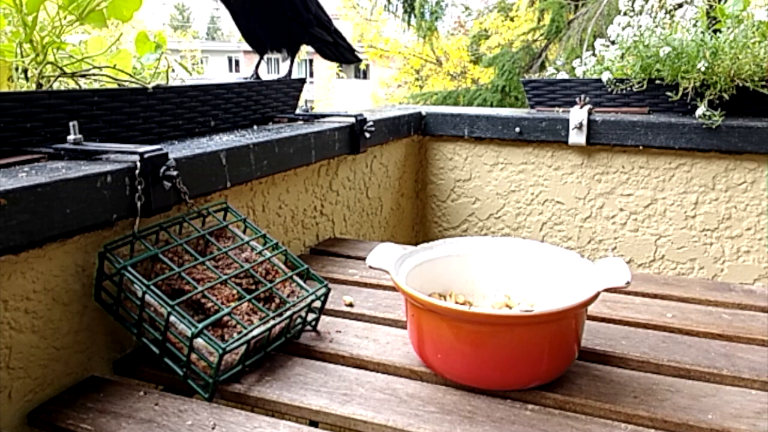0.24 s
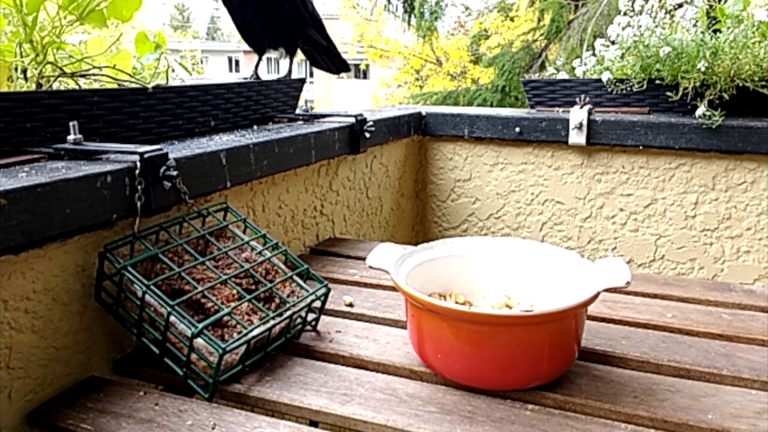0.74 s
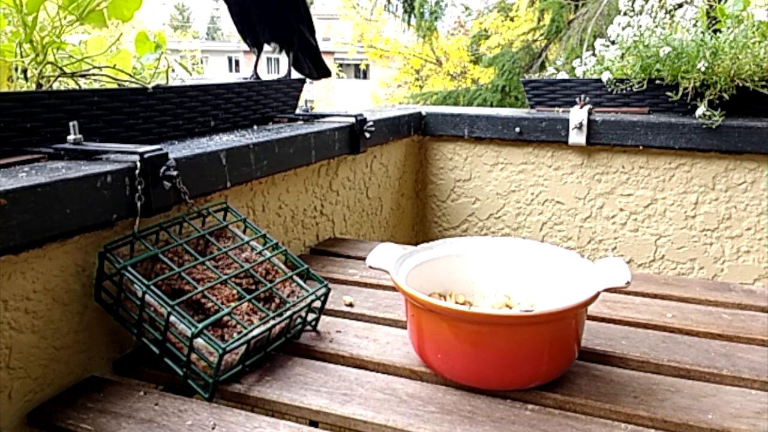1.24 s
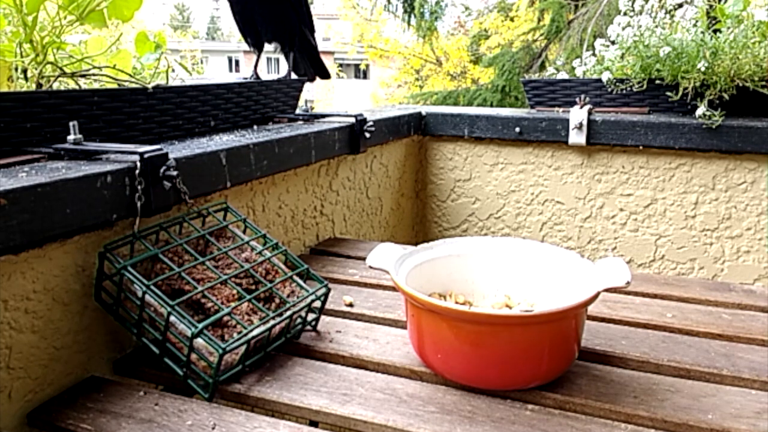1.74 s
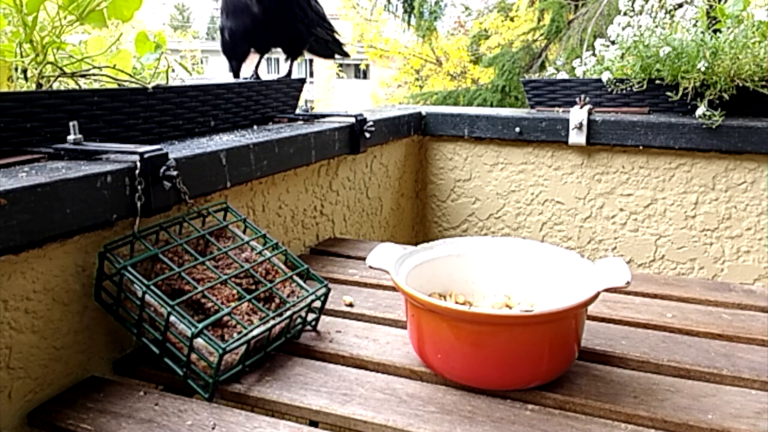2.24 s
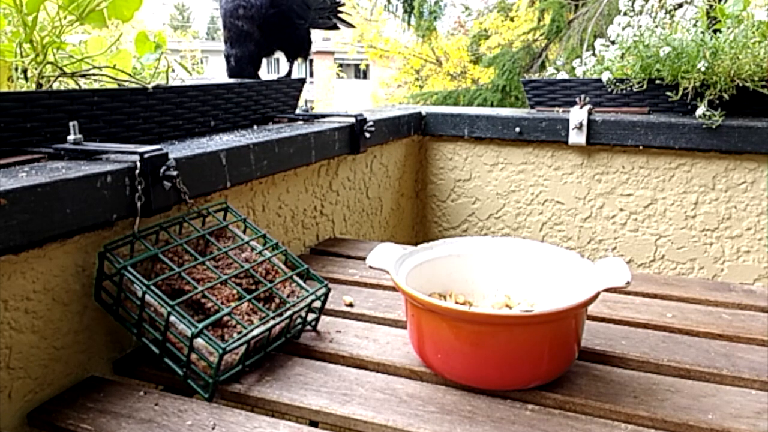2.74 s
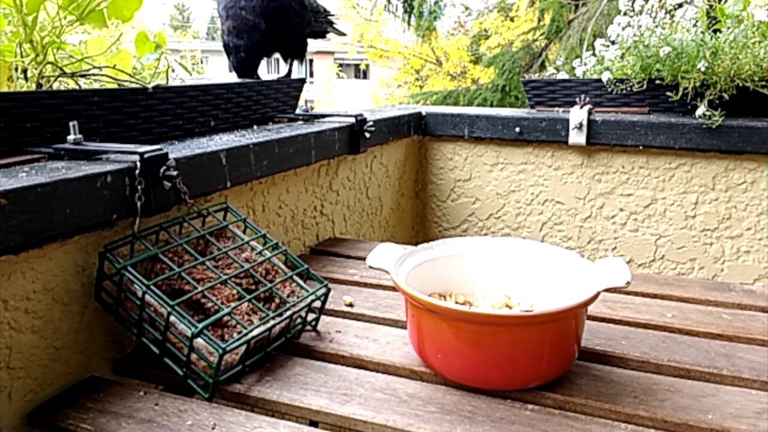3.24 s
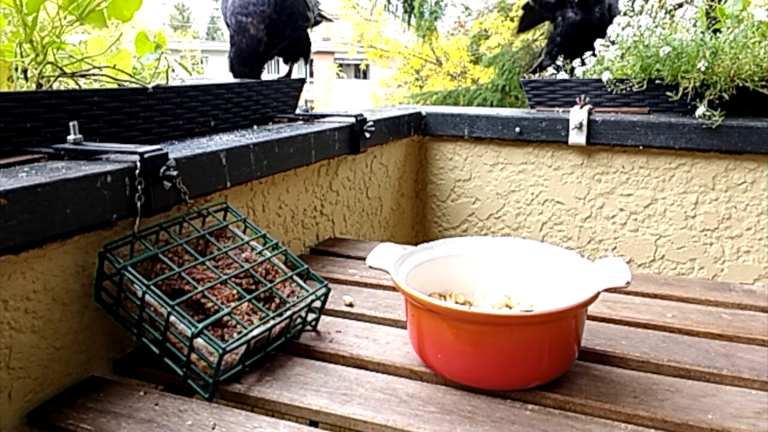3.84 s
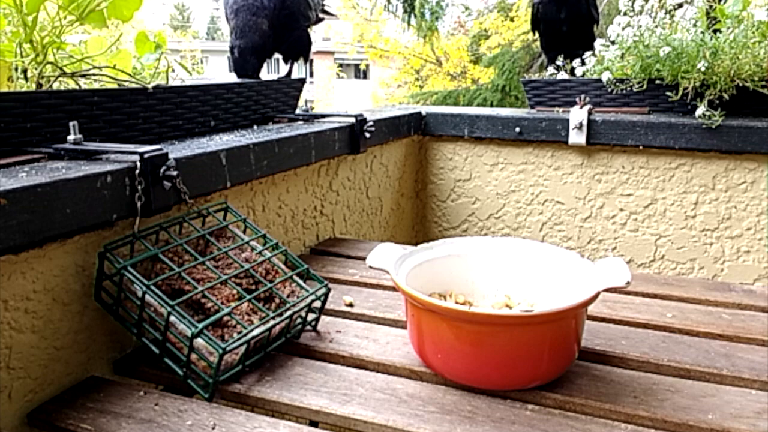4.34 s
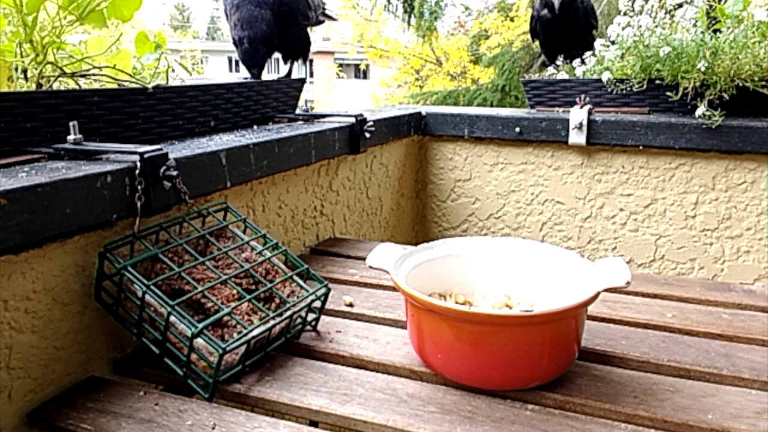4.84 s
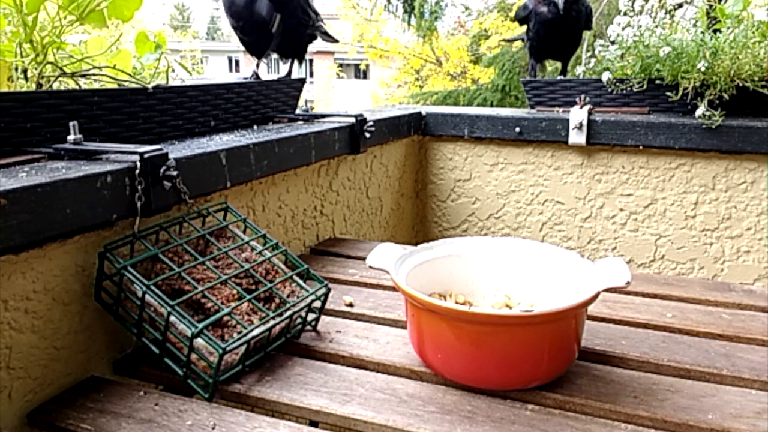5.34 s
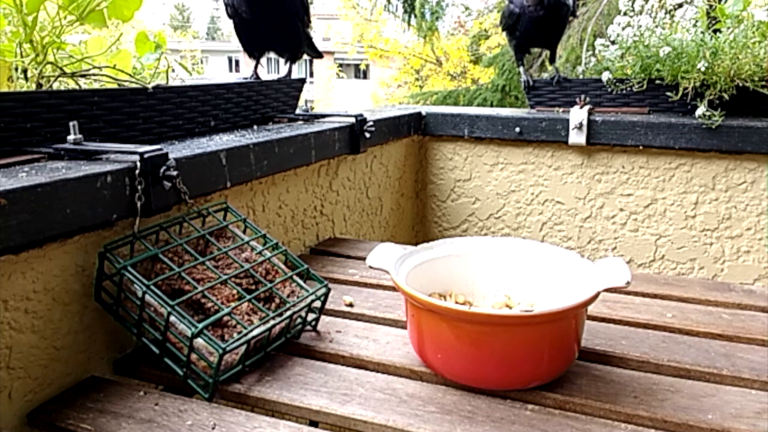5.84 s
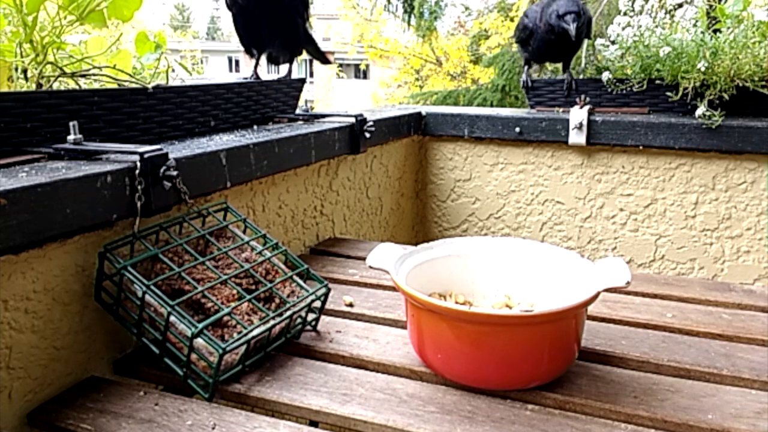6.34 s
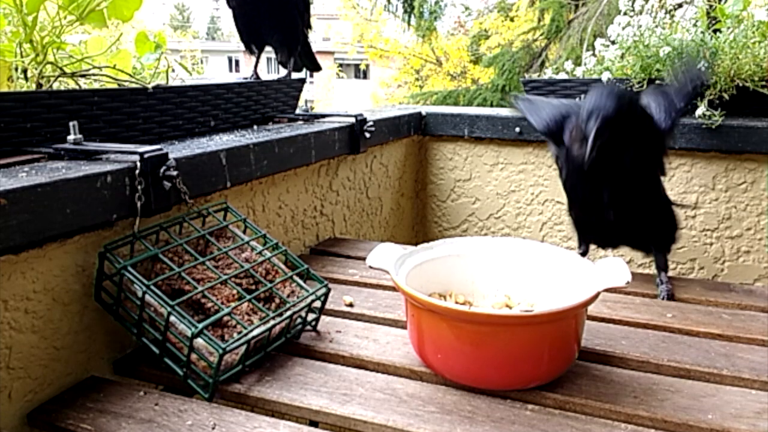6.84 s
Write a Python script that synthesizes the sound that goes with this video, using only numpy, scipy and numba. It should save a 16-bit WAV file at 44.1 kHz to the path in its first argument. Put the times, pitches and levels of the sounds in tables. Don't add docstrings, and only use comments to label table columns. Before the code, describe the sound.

Throughout, a soft, low town rumble with distant vehicles swelling gently, strongest near 1.5 s, a faint steady fan hum and a fine, fluctuating drizzle hiss. Small drops tick on leaves, spit brightly on thin plastic and drip with tiny short notes. Between about 2.1 and 3.2 s a small bird peeps very faintly far off. At 3.7 s a bird lands on a planter with a light knock, a claw scrape and a low wobble; feet settle at 3.9 s. Harsh, nasal caws follow at 4.9, 5.5 and 6.3 s, each about a third of a second, scooping up then sagging, with close wall reflections and a fainter yard echo. Small claw scratches and steps fall around them. At 6.9 s a rapid, heavy cluster of blows and scraping claws hits the wooden table with a low thud, then at 7.07 s two quick claw clacks strike a dish as it ends.

```python
import sys
import numpy as np
from scipy import signal
from scipy.fft import rfft, irfft
from scipy.io import wavfile
from scipy.ndimage import uniform_filter1d
from numba import njit

SR = 44100
rng = np.random.default_rng(int(sys.argv[2]) if len(sys.argv) > 2 else 0)


def waveform_to_disk(signal):
    frames = np.transpose(np.atleast_2d(signal))
    scaled = np.clip(frames, -1, 1) * 32767
    samples = np.round(scaled).astype(np.int16)
    wavfile.write(sys.argv[1], SR, samples)


def ratio_of_db(decibels):
    return 10 ** (np.asarray(decibels, float) / 20)


N = 313551


def level(x, db):
    return x * ratio_of_db(db) / np.sqrt(np.mean(x ** 2))


@njit
def moving_resonance(x, hz, width_hz):
    out, band_state, low_state = np.empty(len(x)), 0., 0.
    for i in range(len(x)):
        g = np.tan(np.pi * hz[i] / SR)
        k = width_hz / hz[i]
        v = (band_state + g * (x[i] - low_state)) / (1 + g * (g + k))
        band_state = 2 * v - band_state
        low_state += 2 * g * v
        out[i] = k * v
    return out


def band(x, hz, width_hz):
    centre = np.clip(hz, 20, .45 * SR) + np.zeros(len(x))
    once = moving_resonance(x, centre, 1. * width_hz)
    return moving_resonance(once, centre, 1. * width_hz)


def ring(x, modes):
    out = np.zeros(len(x))
    for k, (hz, db, t60) in enumerate(modes):
        pole = np.exp(2j * np.pi * hz / SR - np.log(1000) / (t60 * SR))
        out += (-1) ** k * ratio_of_db(db) * signal.lfilter([1], [1, -pole], x).imag
    return out


def colour(x, points):
    hz, db = np.transpose(points)
    f = np.arange(len(x) // 2 + 1) * SR / len(x) + 1
    return irfft(rfft(x) * ratio_of_db(np.interp(np.log(f), np.log(hz), db)), len(x))


def walk(rate):
    k = int(SR / rate)
    held = np.repeat(rng.standard_normal(N // k + 1), k)
    return 1.56 * uniform_filter1d(uniform_filter1d(held, k), k)[:N]


def add(out, s, sound):
    i = int(s * SR)
    out[i:i + len(sound)] += sound[:len(out) - i]


# hz, level_db (per Hz)
TOWN_SPECTRUM = [(15, -38), (25, -44), (49, 4), (71, 4), (132, -7.5), (187, -8), (244, -8.5), (356, -15.5),
                 (960, -19), (1880, -26), (3040, -27.5), (3870, -30), (9380, -32), (15200, -24.5)]
# nearest_s, level_db (above the hum), fade_s
VEHICLES = [
    (0.1, 2, 0.44),
    (1.48, 5.5, 0.21),
    (4.3, 0.5, 0.16),
    (5.95, 3.5, 0.19),
    (6.8, 2.5, 0.27),
]
# time_s, level_db (against its mean)
DRIZZLE = [(0.0, 4.5), (0.2, -.5), (1.3, 2.5), (1.58, 2), (1.82, 0), (2.4, 0.5), (2.8, -1), (3.2, 2),
           (3.54, 4.5), (3.8, 0), (4.34, -2), (4.85, 0), (5.33, 6.5), (5.56, -3.5), (5.9, 2), (6.4, -2),
           (6.73, 1.5), (7.0, 4)]


def town():
    t = np.arange(N) / SR
    traffic_db = sum(db * np.exp(-((t - s) / fade_s) ** 2) for s, db, fade_s in VEHICLES)
    drizzle_db = np.interp(t, *np.transpose(DRIZZLE))
    f = np.arange(N // 2 + 1) * SR / N + 1
    out, shared = 0, walk(14)
    for hz in 25 * 2 ** np.arange(0, 9.7, .4):
        wet = np.clip(np.log2(hz / 300) / 4, 0, 1)
        swell_db = (1 - wet) * traffic_db + wet * drizzle_db
        hits = (rng.random(N) < 25 / SR) * np.minimum(rng.exponential(size=N), 2.5)
        soft_hits = uniform_filter1d(hits, size=300) * 1.8
        specks = signal.lfilter([1], [1, -np.exp(-1 / (0.013 * SR))], soft_hits)
        flicker_db = wet * (.9 * shared + walk(14))
        gain = ratio_of_db(swell_db + flicker_db) * (1 + .5 * wet ** 2 * specks)
        shape = np.cos(np.pi / 2 * np.clip(np.log2(f / hz) / .4, -1, 1))
        out = out + gain * irfft(rfft(rng.standard_normal(N)) * shape, N)
    fan_hz, fan_db = 119.4, -56
    fan = ratio_of_db(fan_db + 2 * walk(7.3)) * np.sin(2 * np.pi * fan_hz * t + 0.16 * walk(22))
    return level(colour(out, TOWN_SPECTRUM), -47) + fan


def burst(db, t60, rise_s=0.00093):
    t = np.arange(int(.35 * SR)) / SR
    rise = 1 - np.exp(-t / rise_s)
    fade = ratio_of_db(-60 * t / t60) + 2.14 * ratio_of_db(-60 * t / 0.031)
    return ratio_of_db(db) * rng.standard_normal(len(t)) * rise * fade


def splashes(table, t60, share):
    out = np.zeros(N)
    for s, db, hz in table:
        width_hz = share * hz
        add(out, s, band(burst(db, t60, rise_s=0.0012), hz, width_hz) / np.sqrt(width_hz / SR))
    return ratio_of_db(-12.0) * out


# start_s, peak_db, pitch_hz
LEAF_DROPS = [(0.018, -48, 5000), (0.157, -47.5, 4420), (0.21, -46.5, 9030), (0.745, -41.5, 4600),
              (0.924, -42.5, 10300), (0.9666, -40.5, 5780), (1.0794, -43, 6600), (1.2266, -48.5, 3620),
              (1.4643, -37, 7300), (1.7544, -43.5, 8700), (2.029, -44.5, 7400), (2.1879, -48, 7900),
              (2.3441, -49.5, 1570), (2.382, -47, 8000), (2.5451, -46.5, 2600), (2.6183, -51, 3750),
              (2.6594, -51, 3840), (2.7697, -47, 2100), (3.0989, -46.5, 6030), (3.579, -46.5, 4380),
              (3.76, -54, 2300), (3.985, -51, 3080), (4.0427, -52, 2900), (4.0632, -38.5, 10000),
              (4.13, -54, 2970), (4.3794, -54, 4670), (4.4577, -46.5, 2840), (4.5393, -45, 7350),
              (4.8696, -38.5, 9000), (6.129, -46.5, 2520)]
# start_s,
# peak_db, pitch_hz
PLASTIC_DROPS = [(0.158, -36, 15200), (0.9664, -40, 13600), (1.0794, -40, 14600), (2.2214, -36, 13800),
                 (2.3501, -37, 14800), (2.8409, -38, 14300), (3.1194, -37, 14500), (3.2994, -37, 14800),
                 (3.4694, -36, 15400), (3.5094, -41, 12800), (3.691, -30, 15100), (3.7194, -35, 15300),
                 (3.927, -37, 15100), (4.5386, -39, 14100), (4.803, -42, 13400), (5.2165, -30, 14100),
                 (5.3154, -35, 15100), (5.9414, -45, 10800), (5.9594, -43, 15100), (6.0581, -43, 14000),
                 (6.0851, -40.5, 12200), (6.4847, -27.5, 14500), (6.7186, -35.5, 9200)]
# start_s, peak_db, pitch_hz
DRIPS = [(0.5994, -68, 2840), (0.659, -50.5, 3060), (0.9368, -46.5, 1685), (1.0331, -51, 2780),
         (1.0799, -44.5, 2300), (1.1444, -51, 2970), (1.1653, -49, 1760), (1.2271, -55, 3820),
         (1.4785, -51, 2830), (1.5604, -54, 4000), (1.7579, -53, 2740), (2.0303, -54, 1700),
         (2.1216, -45.5, 1690), (2.1683, -52, 1670), (2.2223, -49.5, 3370), (2.3231, -54, 1810),
         (2.4094, -49.5, 3420), (2.4414, -48, 1590), (2.4733, -52, 3120), (2.5007, -51.5, 1700),
         (2.645, -53, 3050), (2.7994, -46, 3130), (3.046, -50, 3050), (3.1408, -48, 2390),
         (3.2929, -48, 3020), (3.5763, -50, 1700), (4.1794, -58, 3000), (4.3246, -56, 2460),
         (4.811, -47, 3100), (6.1694, -63, 1450)]


def raindrops():
    leaves = splashes(LEAF_DROPS, t60=.1, share=.15)
    plastic = splashes(PLASTIC_DROPS, t60=.14, share=.6)
    return leaves + plastic + splashes(DRIPS, t60=.06, share=.09)


@njit
def walls(x, lags, gain, damp):
    line, soft, out = np.zeros((8, 4096)), np.zeros(8), np.zeros(len(x))
    for i in range(len(x)):
        total = 0.
        for k in range(8):
            soft[k] += (1 - damp) * (gain[k] * line[k, (i - lags[k]) & 4095] - soft[k])
            total += soft[k]
            out[i] += soft[k] * (1 - 2 * (k % 2))
        for k in range(8):
            line[k, i & 4095] = x[i] + soft[k] - total / 4
    return out


# pitch_hz, level_db, t60_s
WALL_MODES = [(1333, 7.5, 0.29), (1455, 3, 0.23), (1593, -4, 0.39), (1736, 0, 0.17), (1920, -4, 0.32),
              (2100, 8.5, 0.15), (1051, 12.5, 0.05), (3094, 8.5, 0.3)]


def echoes(near, bird):
    lags = np.array([331, 419, 557, 683, 809, 947, 1153, 1361])
    walls_t60_s, yard_t60_s = 0.28, 1.26
    echo = walls(near, lags, ratio_of_db(-60 * lags / SR / walls_t60_s), 0.19)
    echo += ratio_of_db(-15.5) * walls(bird, 3 * lags, ratio_of_db(-180 * lags / SR / yard_t60_s), 0.28)
    return ratio_of_db(-9.5) * echo + ratio_of_db(-57.0) * ring(bird, WALL_MODES)


# start_s, length_s, level_db, start_hz, end_hz
FAR_BIRD = [
    (2.075, .03, -68, 5000, 4750),
    (2.445, .06, -69, 4850, 5000),
    (2.605, .03, -67, 3350, 3750),
    (2.625, .11, -64, 3760, 3780),
    (2.61, .03, -68, 5050, 4900),
    (2.315, .05, -65, 1850, 1550),
    (3.14, .11, -65, 2350, 2280),
    (2.5, .08, -66, 1700, 1680),
]


def far_bird():
    out = np.zeros(N)
    for s, length_s, db, start_hz, end_hz in FAR_BIRD:
        n = int(length_s * SR)
        hz = np.linspace(start_hz, end_hz, n) * (1 + .006 * walk(120)[:n])
        loudness = ratio_of_db(db + 2 * walk(80)[:n]) * np.hanning(n) ** .5
        add(out, s, loudness * np.sin(2 * np.pi * np.cumsum(hz) / SR))
    return out


# start_s, blow_db, scrape_db, scrape_t60_s
ON_PLANTER = [
    (3.671, -33.5, -47, 0.11),
    (3.685, -50, -44.5, 0.42),
    (3.715, -48, -65, 0.25),
    (3.915, -46, -59, .1),
    (4.869, -67, -44, 0.082),
    (4.89, -57, -49, 0.057),
    (5.44, -41.5, -61, 0.091),
    (5.94, -38.5, -64, 0.12),
]
ON_TABLE = [
    (6.91, -58, -69, .3),
    (6.926, -23, -34, 0.098),
    (6.931, -30, -31, 0.16),
    (6.938, -23.5, -34, 0.26),
    (6.943, -25, -37, 0.094),
    (6.948, -24.5, -41, 0.094),
    (6.957, -21, -45, 0.1),
    (6.985, -30.5, -46, 0.11),
]
ON_DISH = [
    (7.068, -34.5, -38, 0.32),
    (7.0755, -31, -37.5, 0.48),
]
# pitch_hz, level_db, t60_s
PLANTER = [(194, -2.5, 0.055), (335, -3, 0.072), (430, 4, 0.011), (644, -3.5, 0.038), (1003, -10.5, 0.082)]
TABLE = [(161, -16, 0.064), (275.7, -11, 0.093), (317, -11, 0.17), (436, -6.5, 0.074), (622, -7, 0.042),
         (904, -8, 0.046), (1253, -9, 0.055), (1506, -4, 0.058), (1815, -2, 0.021), (2260, -7.5, 0.04)]
DISH = [(314, -7.5, 0.04), (1350, -6, 0.05), (1830, -3.5, 0.041), (2282, 3, 0.024), (3500, -17, .03)]
# hz, level_db (per Hz)
SCRAPE = [(350, -28), (600, -13), (1110, -3.5), (1490, -6), (3990, -10.5), (5050, -10), (6730, -15.5),
          (14500, -13.5), (16000, -22)]


def feet(table, body, push_s):
    blows, claws = np.zeros(N), np.zeros(N)
    for s, blow_db, claw_db, t60 in table:
        add(blows, s, ratio_of_db(blow_db) * np.array([1.]))
        add(claws, s, burst(claw_db, t60))
    k = push_s * SR
    pushed = signal.lfilter([1 / k], [1, 1 / k - 1], blows)
    scraped = colour(claws, SCRAPE) * ratio_of_db(8.0)
    return ring(pushed + ratio_of_db(-29.5) * claws, body) + scraped


# start_s, level_db, pitch_hz, t60_s
SWAYS = [
    (3.705, -27, 59.4, 0.37),
    (6.932, -11, 113, 0.15),
    (6.98, -20.5, 143.7, 0.21),
    (7.067, -20, 139, 0.087),
]


def sway(s, db, hz, t60):
    t = np.maximum(np.arange(N) / SR - s, 0)
    return ratio_of_db(db - 60 * t / t60) * (1 - np.exp(-t / 0.016)) * np.sin(2 * np.pi * hz * t)


@njit
def pulses(hz, rough, jitter, shimmer):
    out, p, k = np.zeros(len(hz) + 1), 0., 0
    for i in range(len(hz)):
        step = hz[i] * np.exp(rough[i] * jitter[k]) / SR
        p += step
        if p >= 1:
            p, k = p - 1, k + 1
            size = np.exp(rough[i] * shimmer[k])
            out[i] += size * p / step
            out[i + 1] += size * (1 - p / step)
    return out[:-1]


def resonances(source, table, scale):
    return sum((-1) ** k * ratio_of_db(db) * band(source, f * scale, w) for k, (f, w, db) in enumerate(table))


# pitch_hz, width_hz, level_db
THROAT = [(910, 1600, -13.5), (1374, 375, 6.5), (1840, 760, -2), (2640, 2100, -14.5)]
# ratio (multiple of the first), width_hz, level_db
UPPER_BEAK = [(1.271, 820, 1.5), (1.95, 1360, 3), (2.5, 2000, -12.5), (2.95, 2400, -11), (3.6, 3000, -13)]


def caw(top_hz, length_s, effort_db, sag_db_per_s, open_s):
    t = np.arange(int(.55 * SR)) / SR
    past_release = np.maximum(t - length_s, 0)
    effort = effort_db - sag_db_per_s * t - 380 * past_release
    effort += 9 * np.exp(-t / .004)
    effort -= 19 * np.exp(-t / .0125)

    hold_s, sag_hz_per_s = .115, 650
    hz = top_hz * (1 - .2 * np.exp(-t / .022)) - sag_hz_per_s * np.clip(t - hold_s, 0, length_s - hold_s)

    opened = np.clip(t / open_s, 0, 1)
    beak_hz = 3280 + (3800 - 3280) * opened
    beak_db = -0.5 + (-8 + 0.5) * opened - 18 * np.exp(-t / 0.029)
    upper_db = -15.5 + (-7 + 15.5) * np.minimum(1.68 * opened, 1)

    rough = .5 + (.3 - .5) * np.exp(-(t / .08) ** 2)
    chance = rng.standard_normal((len(t) // 30, 2)).T
    folds = pulses(hz, rough, .11 * chance[0], .25 * chance[1])
    air = uniform_filter1d(folds, size=80) * rng.standard_normal(len(t))
    source = level(folds, 0) + rough * level(air, 3.0)

    pipe = resonances(source, THROAT, 1)
    gape_hz = 3500 * (beak_hz / 3500) ** 0.24
    upper = resonances(source, UPPER_BEAK, gape_hz)
    shut = level(band(source, beak_hz, 520), -1.5)
    wide = level(band(source, beak_hz, 850), -1.5)
    beak = ratio_of_db(beak_db) * (wide + (shut - wide) * np.clip(1.3 - 2 * opened, 0, 1))
    beak -= ratio_of_db(upper_db) * level(upper, -1.74)

    clear_db = effort - 21.5 + 5 * t - 200 * np.maximum(t - length_s + .06, 0)
    phase = 2 * np.pi * np.cumsum(hz * (1 + 0.012 * walk(118.6)[:len(t)])) / SR
    partials = np.sin(phase) + ratio_of_db(1.5) * np.sin(2 * phase)
    clear = ratio_of_db(clear_db + 3.5 + 2.0 * walk(64)[:len(t)]) * partials

    fade = np.minimum(t / .001, 1)
    rattle_db = 2.0 * walk(140)[:len(t)]
    return (level(pipe, -0.89) + beak) * ratio_of_db(effort + rattle_db) * fade, clear * fade


# start_s, length_s (to the release), effort_db, sag_db_per_s, open_s (for the beak)
CAWS = [
    (4.922, .31, -28.5, 22.5, 0.29),
    (5.479, 0.38, -29, 14, 0.3),
    (6.335, .37, -28.5, 13, .26),
]
CAW_TOP_HZ = [
    490,
    517,
    512,
]


def crow():
    bird, low = np.full((2, N), 1e-18)
    for top_hz, (s, *shape) in zip(CAW_TOP_HZ, CAWS):
        rasp, clear = caw(top_hz, *shape)
        add(bird, s, rasp)
        add(low, s, clear)
    return bird, low


def scene():
    bird, low = crow()
    near = bird + far_bird() + raindrops()
    near += feet(ON_PLANTER, PLANTER, push_s=0.00015)
    near += feet(ON_TABLE, TABLE, push_s=0.000099)
    near += feet(ON_DISH, DISH, push_s=.00005)
    low += sum(sway(*row) for row in SWAYS)
    return (near + low + echoes(near, bird) + town())[None]


def band_limit(x):
    return signal.sosfilt(signal.butter(12, 17070, fs=SR, output="sos"), x)


def record(dry):
    x = signal.sosfilt(signal.butter(2, 45, "high", fs=SR, output="sos"), dry)
    x = signal.sosfilt(signal.ellip(10, .2, 80, 15760, fs=SR, output="sos"), x)
    return band_limit(x)


dry = scene()
out = record(dry)
waveform_to_disk(out)
```